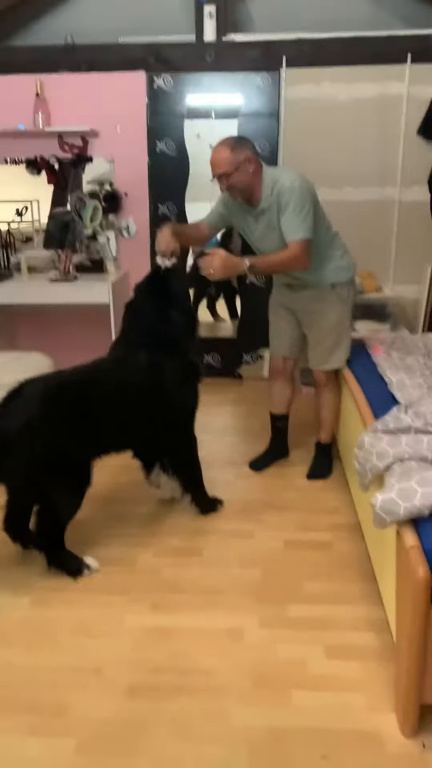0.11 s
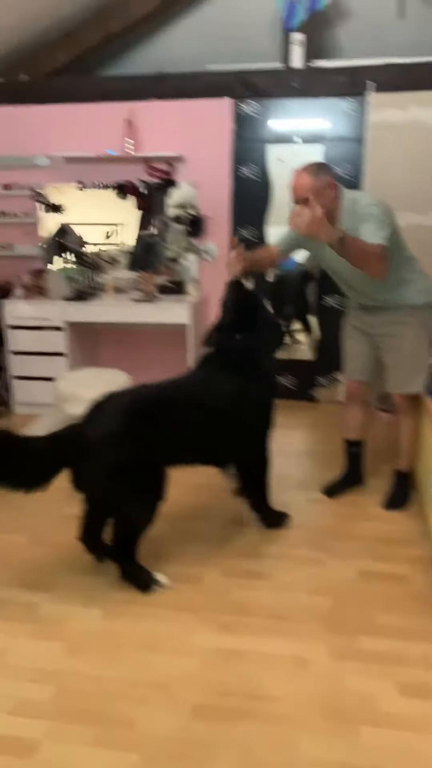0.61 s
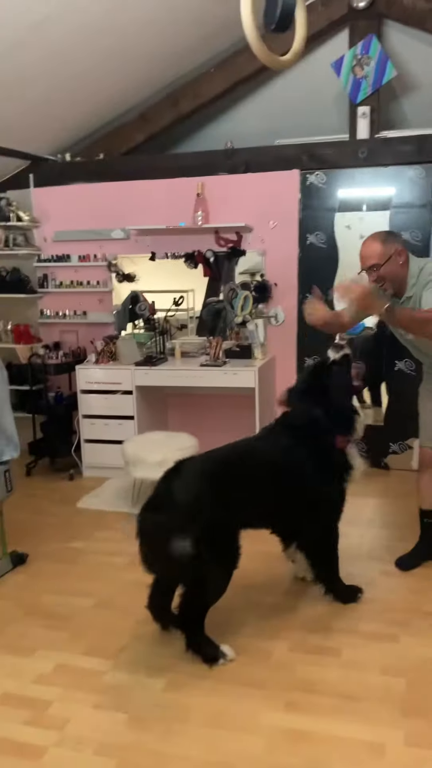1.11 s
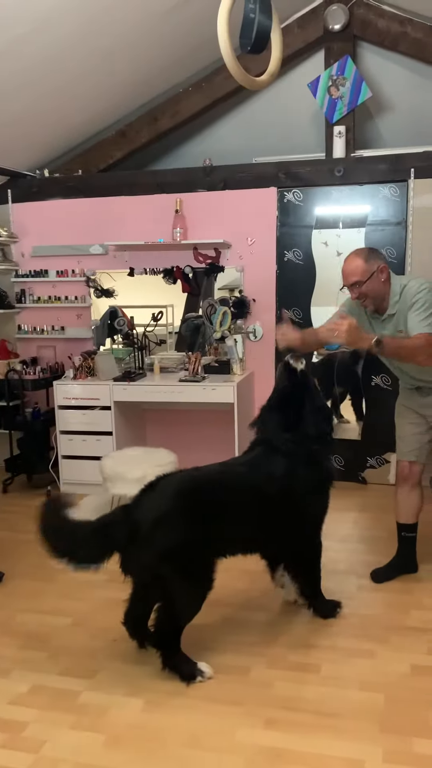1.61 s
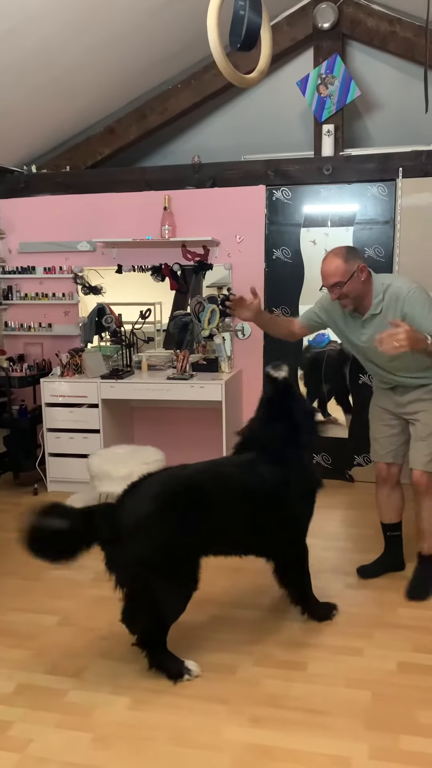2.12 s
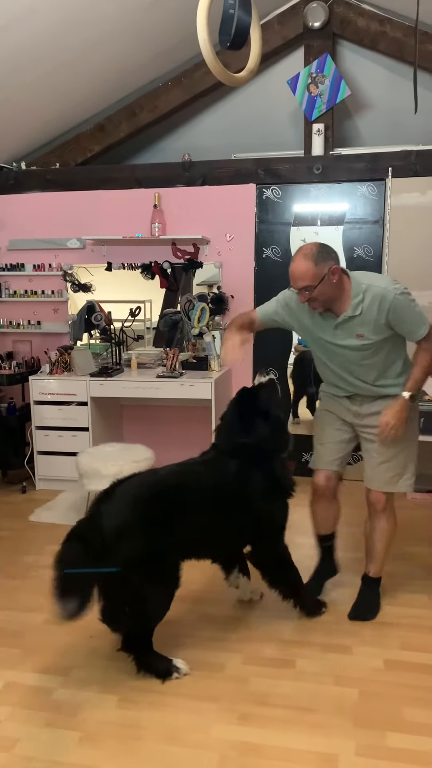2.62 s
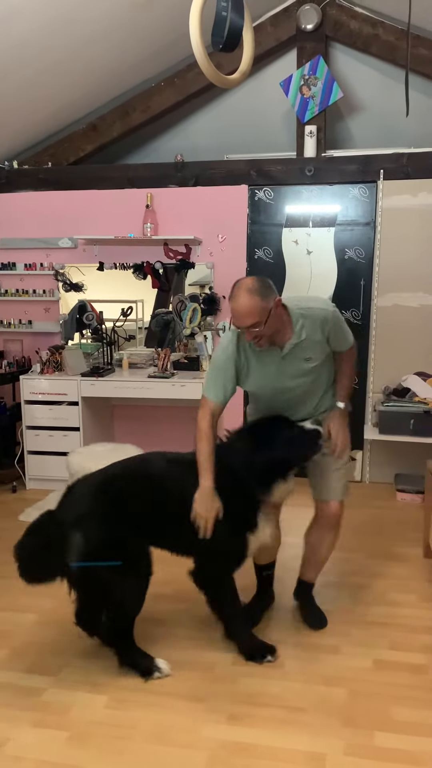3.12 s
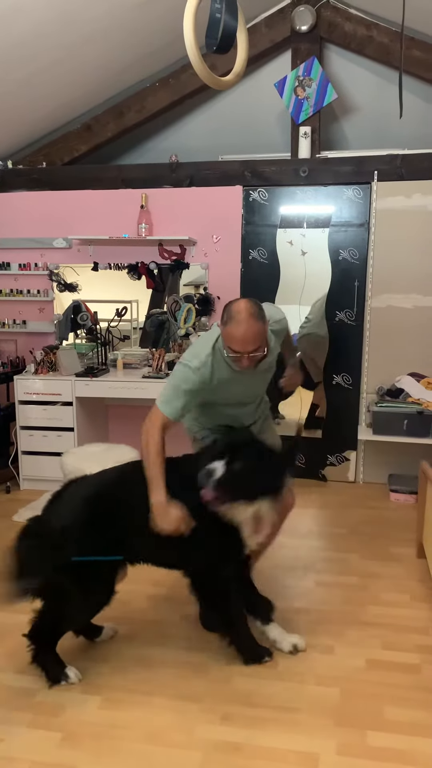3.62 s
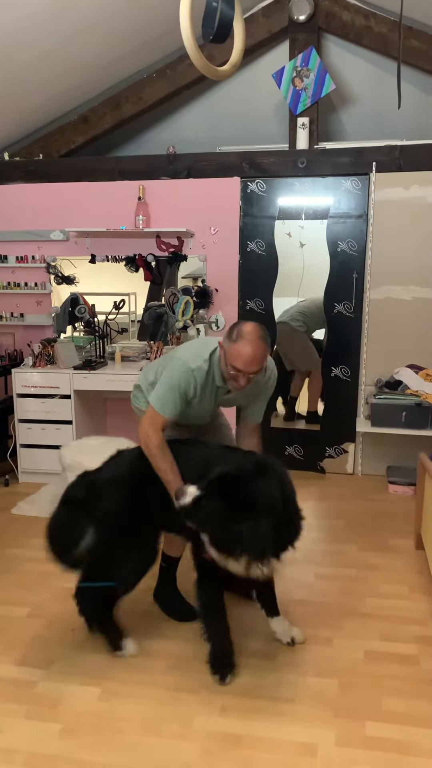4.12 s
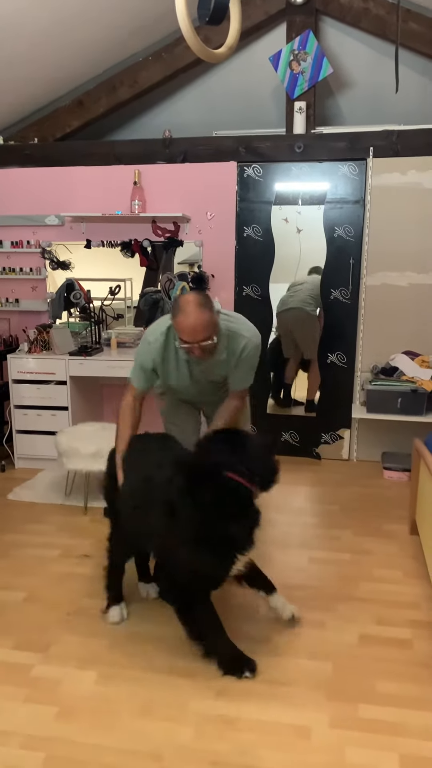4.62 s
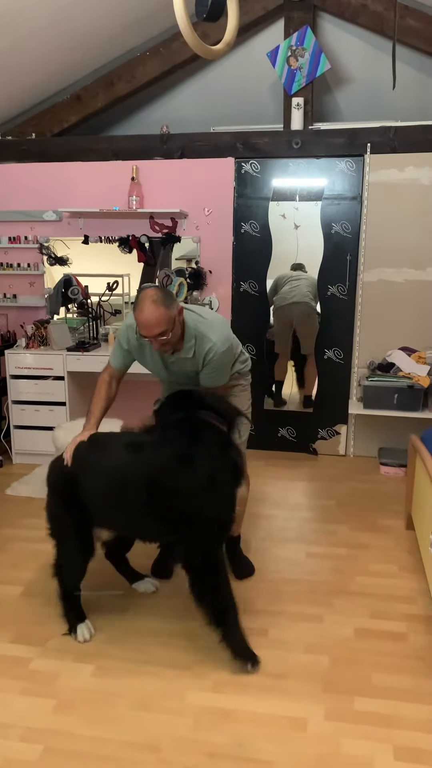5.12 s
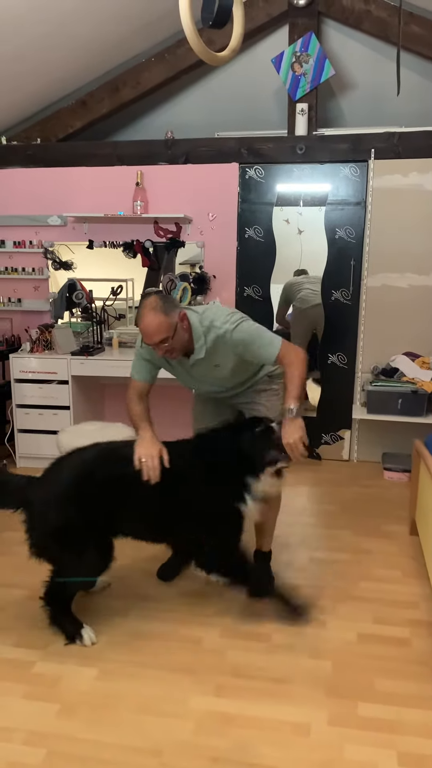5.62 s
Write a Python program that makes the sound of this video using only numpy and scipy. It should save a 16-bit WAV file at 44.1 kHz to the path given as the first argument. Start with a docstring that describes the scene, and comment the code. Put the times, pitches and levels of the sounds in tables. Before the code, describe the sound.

A big dog plays in a furnished attic room. Soft, rough growls and quick huffs come in the first two seconds, with scattered claw cracks and muffled paw slides. A hard stomp lands near three seconds, then scuffs, huffs and brighter scrabbling lead to heavy claw-and-paw blows at the end. Close handheld stereo microphone, short room ring, faint hush.

```python
"""Large dog at play in an attic room

A large dog growls and huffs; its claws crack on a hollow laminate floor, its paws thud, slide and scuff.
Voice and breath are sources filtered by resonances, slides and cracks are shaped noise, and the
struck floor is a sum of dying modes. The furnished room rings for about half a second over a faint
hush. Two microphone ports hear the same treble a fraction of a millisecond apart."""
import sys
import numpy as np
from scipy import signal
from scipy.fft import rfft, irfft
from scipy.io import wavfile
from scipy.ndimage import uniform_filter1d

SR = 44100
rng = np.random.default_rng(int(sys.argv[2]) if len(sys.argv) > 2 else 0)


def boost(x):
    """Linear amplitude factor 10**(x/20) for a level x in decibels (scalar or array-like)."""
    u = np.asarray(x, float) / 20
    return 10 ** u


def put_to_file(sound):
    """Save the sound as 16-bit audio at rate SR, in the file named by the first command-line argument."""
    columns = np.atleast_2d(sound).T  # one column per channel
    safe = np.clip(columns, -1, 1)
    whole_steps = np.round(safe * 32767)
    wavfile.write(sys.argv[1], SR, whole_steps.astype(np.int16))


N = 253134  # samples


def evened(x):
    """Normalisation: scales x to an rms of 1."""
    return x / np.sqrt(np.mean(x ** 2) + 1e-20)


def slow_noise(count, size):
    """Random modulation: white noise averaged over size samples, rms 1."""
    return evened(uniform_filter1d(rng.standard_normal(count), size=size))


def read(points, hz):
    """Logarithmic frequency scale: interpolates a curve of (Hz, value) points."""
    f, value = np.transpose(points)
    return np.interp(np.log(hz + 1), np.log(f + 1), value)


def coloured(x, gain_db):
    """Linear filtering: multiplies the spectrum by a gain that depends on frequency."""
    return irfft(rfft(x) * boost(gain_db(np.fft.rfftfreq(len(x), 1 / SR))), len(x))


def add(mix, start_s, sound):
    """Superposition: adds a sound to the mix in place, cut off at the end."""
    part = mix[round(start_s * SR):][:len(sound)]
    part += sound[:len(part)]


def swell(length_s, peak, ends_db):
    """Amplitude envelope: climbs to 1 at the place peak and sinks to ends_db at both ends."""
    u = np.linspace(0, 1, round(length_s * SR))
    peak = np.clip(peak, .02, .98)
    away = np.where(u < peak, 1 - u / peak, (u - peak) / (1 - peak))
    return boost(ends_db * away ** 2) * signal.windows.tukey(len(u), .06)


def resonate(x, hz, width_hz):
    """Heterodyne resonance: shifts hz (fixed or gliding) to zero, smooths twice, shifts back; gain 1."""
    turn = np.exp(2j * np.pi * np.cumsum(hz * np.ones(len(x))) / SR)
    r = np.exp(-np.pi * width_hz / SR)
    once = signal.lfilter([1 - r], [1, -r], x / turn)
    twice = signal.lfilter([1 - r], [1, -r], once)
    return 2 * (turn * twice).real


def ring(modes, weights, rise_s):
    """Modal decay: a blow excites damped modes, each detuned a little at random; peak 1."""
    t = np.arange(SR // 4)[:, None] / SR
    hz, level_db, t60_s = np.transpose(modes)
    detune, start = rng.random((2, len(hz)))
    phase = 2 * np.pi * (hz * (0.966 + 0.073 * detune) * t + 0.089 * start)
    tones = boost(level_db - 60 * t / t60_s) * np.sin(phase)
    out = (tones * weights).sum(1) * (1 - np.exp(-t[:, 0] / rise_s))
    return out / abs(out).max()


# Colour of the background hush: [frequency_hz, relative level_db]
HUSH_COLOUR = [(24, -47), (40, -4), (866, 7), (1170, 6), (6300, -9), (8690, -11), (15000, -20)]


def hush():
    """Stationary noise: two independent coloured noises, one a channel, at a steady rms level."""
    level_db = -63
    noises = rng.standard_normal((2, N))
    return boost(level_db) * np.array([evened(coloured(v, lambda hz: read(HUSH_COLOUR, hz))) for v in noises])


# Colour of a bright rub: [frequency_hz, relative level_db]
RUB_COLOUR = [(200, -17.5), (800, -27), (2500, -7.5), (5500, 1), (8000, -1), (11000, -10), (15500, -19)]
# Change of colour at full dullness, of rubs and cracks alike: [frequency_hz, gain_db]
DULLING = [(200, 20), (1000, 21), (3000, -0.5), (6000, -10), (15500, -42.5)]


def slide(length_s, level_db, dullness, peak):
    """Sliding friction: uneven grains of grit come in clumps; a duller and a brighter rub mix."""
    shape = swell(length_s, peak, -19)
    dullness = np.clip(dullness, 0, 1)
    clumps = slow_noise(len(shape), 700)
    grains = np.minimum(rng.exponential(1, (2, len(shape))), 5)
    grit = rng.standard_normal((2, len(shape))) * boost(3.9 * grains + 4.1 * clumps)
    bright = evened(coloured(grit[0], lambda hz: read(RUB_COLOUR, hz)))
    soft = evened(coloured(grit[1], lambda hz: read(RUB_COLOUR, hz) + read(DULLING, hz)))
    mixed = np.sqrt(1 - dullness) * bright + np.sqrt(dullness) * soft
    return boost(level_db) * mixed * shape


# Slides of the paws: [start_s, length_s, pressure_db, dullness (0-1), place of the peak (0-1)]
PAW_SLIDES = [(0.102, 0.11, -51.5, 0.96, 0), (0.214, 0.1, -51.5, 0.94, 0.16), (.5, 0.21, -46, 0.94, 0),
              (0.819, 0.12, -39.5, .7, 0.28), (1.147, 0.082, -45.5, 0.68, 0.06),
              (1.406, .06, -56.5, 0.1, 0.55), (1.75, 0.18, -52.5, 0.67, 0),
              (2.066, 0.21, -43.5, 0.76, 0.56), (2.383, .11, -50, 1, 0.4), (2.558, 0.13, -38.5, 0.48, 0.24),
              (2.822, 0.19, -42.5, 0.89, 0.01), (3.112, 0.27, -34.5, 0.16, 0.33),
              (3.407, 0.13, -42, 0.5, 0.54), (3.601, 0.15, -41, 0.7, 0), (3.792, 0.18, -38, 0.88, 0.4),
              (3.971, .08, -40, 0.48, 0.12), (4.065, 0.18, -35.5, 0.14, 0), (4.249, 0.2, -50, 0.4, 0.66),
              (4.546, 0.12, -36, 0.09, 0), (4.645, 0.19, -43.5, 0.25, 0.46),
              (4.933, 0.076, -40.5, 0.4, 0.23), (5.016, 0.22, -38.5, 0.23, 0),
              (5.243, 0.19, -29.5, 0.02, 0.49)]


def paw_slides():
    """Sliding friction: lays out the slides of the paws."""
    rubs = np.zeros(N)
    for start_s, *row in PAW_SLIDES:
        add(rubs, start_s, slide(*row))
    return rubs


# Low modes of the floor on its joists: [frequency_hz, level_db, t60_s]
FLOOR_MODES = [(57.3, -51, 0.214), (82, -2.5, 0.31), (96.6, 2, 0.11), (142.2, -2.5, 0.13), (208, -12, 0.12),
               (244.3, -9.5, 0.098), (286.5, -6.5, 0.065)]


def thud(peak_db, deep):
    """Modal excitation: the weight of a paw sets the whole floor booming."""
    low = np.array([hz < 120 for hz, *_ in FLOOR_MODES])
    weights = np.where(low, np.clip(deep, 0, 1), np.clip(1 - deep, 0, 1))
    return boost(peak_db) * ring(FLOOR_MODES, weights, .005)


# Paw landings: [start_s, peak_db, share of the deepest floor modes (0-1)]
LANDINGS = [(0.364, -27, 0.07), (0.714, -18, 0.05), (1.002, -25.5, 0.13), (1.93, -17.5, 0.1),
            (2.253, -23, 0.24), (2.448, -25.5, 0.12), (2.679, -25.5, 0.12), (2.85, -21, 0.3),
            (3.04, -13, 0.18), (3.318, -27, 0.4), (3.555, -20, 0.11), (3.901, -37.5, 0.22),
            (4.334, -33, 0.2), (4.418, -19.5, 0.17), (4.511, -20, 0.3), (5.084, -29, 0.13),
            (5.501, -14.5, 0.2), (5.605, -14, 0.1)]


def paw_thuds():
    """Impact: lays out the booms of the landing paws."""
    booms = np.zeros(N)
    for start_s, *row in LANDINGS:
        add(booms, start_s, thud(*row))
    return booms


# Colour of a claw crack: [frequency_hz, relative level_db]
CRACK_COLOUR = [(300, -15.5), (1000, -13.5), (2500, -11), (5000, -3), (7300, -3), (8500, -5.5),
                (11000, -12), (15500, -22.5)]


def crack(peak_db, dullness):
    """Impulsive contact: claws hit the floor together in one short, sharp noise burst."""
    t = np.arange(2048) / SR
    shape = (1 - np.exp(-t / .0004)) * (np.exp(-t / .003) + .1 * np.exp(-t / .007))
    z = rfft(rng.standard_normal(len(t)) * shape)
    burst = irfft(z / abs(z)) * np.sqrt(shape)  # evening the spectrum: no pitch stands out
    burst = coloured(burst, lambda hz: read(CRACK_COLOUR, hz) + dullness * read(DULLING, hz))
    return boost(peak_db) * burst / abs(burst).max()


# Modes of the floor boards: [frequency_hz, level_db, t60_s]
BOARD_MODES = [(693, -17, 0.057), (762.3, 3, 0.082), (924, -10, 0.14), (1150, -1.5, 0.053),
               (1596, 2, 0.027), (2097, -4, 0.021)]


def knock(peak_db):
    """Modal excitation: the struck boards knock, each mode driven by a random amount."""
    return boost(peak_db) * ring(BOARD_MODES, rng.uniform(.5, 1, len(BOARD_MODES)), .002)


# Claw strikes: [start_s, crack peak_db, knock peak_db, dullness (0-1)]
STRIKES = [(0.3636, -13, -25, 0.42), (0.702, -8, -47, 0.24), (0.9703, -12.5, -18.5, 0.39),
           (1.4639, -14, -35.5, 0.21), (1.918, -6, -25, 0.28), (2.2448, -10.5, -28, 0.32),
           (3.0224, -3.5, -14, 0.16), (3.5428, -6.5, -23.5, 0.12), (3.7744, -18, -31, 0.13),
           (4.0662, -21.5, -40, 0.26), (4.4145, -27.5, -27.5, 0.01), (4.4893, -10.5, -17.5, 0.19),
           (5.0122, -14.5, -31, 0.2), (5.0685, -11.5, -29.5, 0.2), (5.4875, -7, -22, 0.16),
           (5.4964, -16.5, -17.5, 1), (5.5968, -5, -14, 0.04)]


def claw_strikes():
    """Friction then impact: each paw skids in just before its claws crack and the boards knock."""
    skid_s, skid_db, skid_dullness = 0.013, -28, 0.33  # level relative to the crack's peak
    skids, cracks, knocks = np.zeros((3, N))
    for start_s, crack_db, knock_db, dullness in STRIKES:
        add(skids, start_s - skid_s, slide(skid_s, crack_db + skid_db, skid_dullness, 0.61))
        add(cracks, start_s, crack(crack_db, dullness))
        add(knocks, start_s, knock(knock_db))
    return skids, cracks, knocks


# Treble gain of the cracks towards the microphone: [frequency_hz, gain_db]
BEAM = [(2500, 0), (6000, 3.5)]


def beamed(cracks):
    """Directivity: the treble of the cracks beams towards the microphone."""
    return coloured(cracks, lambda hz: read(BEAM, hz))


def puff(length_s, level_db, centre_hz, peak):
    """Filtered noise: fluttering noise in a broad resonance, with a weaker one above it."""
    shape = swell(length_s, peak, -17)
    noise = rng.standard_normal(len(shape)) * boost(3.0 * slow_noise(len(shape), 400))
    lower = resonate(noise, centre_hz, 0.37 * centre_hz)
    upper = resonate(noise, 1.79 * centre_hz, 500)
    return boost(level_db) * evened(lower + boost(-10) * upper) * shape


# Breath huffs, and one short paw scuff near 2.3 kHz shaped the same way:
# [start_s, length_s, level_db, centre_hz (of the mouth, for a huff), place of the peak (0-1)]
HUFFS_AND_SCUFF = [(0.127, 0.07, -48.5, 1180, 0.03), (0.795, 0.13, -34.5, 1085, 0.45),
                   (1.343, 0.059, -46, 1150, 0.08), (1.78, 0.12, -39.5, 1110, 0.38),
                   (2.619, .1, -46, 1150, 0.8), (2.826, 0.14, -44, 896, 0), (3.781, 0.16, -40.5, 900, 0.48),
                   (3.967, 0.1, -47, 1030, 0.5), (4.078, .16, -43.5, 977, 0.33),
                   (4.268, 0.058, -43, 960, 0.27), (4.356, 0.08, -38, 930, 0.4),
                   (4.358, 0.076, -46.5, 1390, 0), (4.783, 0.068, -42.5, 2250, 0.53),
                   (5.061, 0.082, -39.5, 935, 0.06)]


def huffs_and_scuff():
    """Noise sources: lays out the breath huffs and the one paw scuff."""
    puffs = np.zeros(N)
    for start_s, *row in HUFFS_AND_SCUFF:
        add(puffs, start_s, puff(*row))
    return puffs


def columns(rows):
    """Linear interpolation: draws each column after the first as a curve over time."""
    s, *values = np.transpose(rows)
    t = np.arange(s[0], s[-1], 1 / SR)
    return [np.interp(t, s, v) for v in values]


# Chest and throat resonances, one row each: [frequency_hz, width_hz]
BODY_RESONANCES = [(160, 403), (320, 300)]
# What the muzzle radiates: [frequency_hz, gain_db]
MUZZLE = [(50, -22), (80, 0), (125, 1), (850, -1.5), (1100, -8)]


def growl(rows, throat_db):
    """Source and filter: loose vocal folds flap unevenly, in bursts, into chest, throat and mouth."""
    pitch_hz, burst_hz = 165.14, 36  # averages
    shut_db, open_db, shut_hz, open_hz = -19, 8.5, 570, 725  # the mouth at openings 0 and 1
    effort_db, opening = columns(rows)
    count = len(opening)
    turns = np.cumsum(pitch_hz * (1 + .12 * slow_noise(count, 400))) / SR
    folds = sum(np.cos(2 * np.pi * k * turns) for k in range(1, 9))
    puffs = np.exp(-(turns % 1) / 0.36) * rng.standard_normal(count)  # air noise in each cycle
    bursts = np.cumsum(burst_hz * (1 + .4 * slow_noise(count, 1200))) / SR
    throb_db = 4 * np.cos(2 * np.pi * bursts) + 2 * slow_noise(count, 500)
    drive = (evened(folds) + 4.5 * evened(puffs)) * boost(throb_db)
    chest, throat = (evened(resonate(drive, hz, width_hz)) for hz, width_hz in BODY_RESONANCES)
    # the mouth resonance grows and rises as the jaws part
    mouth = evened(resonate(drive, shut_hz + (open_hz - shut_hz) * opening, 257))
    mouth_db = shut_db + (open_db - shut_db) * opening
    voice = chest - boost(throat_db) * throat + boost(mouth_db) * mouth
    voice = coloured(voice, lambda hz: read(MUZZLE, hz))
    return boost(effort_db) * voice * signal.windows.tukey(count, .08)


# Growls, one list of points each: [time_s, effort_db, mouth opening (0 shut, 1 open, may exceed 1)]
GROWL_PATHS = [
    [(.09, -34, 0.45), (.14, -41.5, 0.57), (.23, -36.5, 0.72), (.3, -36.5, 0.3), (.36, -35, 0.83),
     (.45, -38.5, 0.7), (.57, -31.5, 0.2), (.7, -36, 0.45), (.88, -46, 0.75)],
    [(1.37, -45.5, 0.57), (1.48, -40.5, 0.51), (1.6, -40, 0.42), (1.7, -37, 0.62), (1.85, -34, 0.76),
     (2.0, -36.5, 0.71), (2.14, -31.5, 0.13), (2.23, -63, 0.3)],
    [(2.62, -47.5, 0.84), (2.7, -48, 0.73), (2.75, -55.5, 0.5), (2.8, -39.5, 0.49), (2.88, -32, 0.46),
     (3.0, -69, 0.4)],
    [(4.68, -42, .2), (4.72, -37.5, 0.37), (4.81, -48.5, 0.35), (4.89, -61, 0.28)],
    [(5.29, -45.5, 0), (5.37, -53, 0.8), (5.4, -37.5, 0.91), (5.44, -51, 1.1), (5.49, -55, 1.26)],
]
# Throat relative to chest, one value a growl: [level_db]
THROAT_LEVELS = [-6, -5.5, 4.5, -7.5, -0.5]


def growls():
    """Phonation: lays out the growls, each with its own balance of throat and chest."""
    voice = np.zeros(N)
    for rows, throat_db in zip(GROWL_PATHS, THROAT_LEVELS):
        add(voice, rows[0][0], growl(rows, throat_db))
    return voice


# Reverberation time by frequency: [frequency_hz, t60_s]
DECAY_TIMES = [(60, 0.46), (200, 0.5), (700, 0.64), (2000, 0.54), (5000, 0.46), (9000, 0.28), (14000, 0.36)]
# Echoes off floor, sloping ceiling and walls: [delay_s, level_db]
REFLECTIONS = [(.0035, -31.5), (.007, -17.5), (0.0103, -14.5), (0.0157, -10.5), (.023, -17)]


def room(direct, sent):
    """Reverberation: echoes, then tails of sparse taps, each band dying at its own speed."""
    onset_s, count = 0.007, 3  # build-up of the tails, number of stereo tails
    taps = np.zeros((2 * count, SR))
    at = np.arange(100, SR - 12, 12)
    at = at + rng.integers(0, 12, (2 * count, len(at)))
    np.put_along_axis(taps, at, rng.choice([-1., 1.], at.shape), 1)
    hz, t, z = signal.stft(taps, SR, nperseg=512)
    decay = boost(-60 * t / read(DECAY_TIMES, hz)[:, None])
    tail = signal.istft(z * decay, SR, nperseg=512)[1][:, :SR]
    tail *= 1 - np.exp(-np.arange(SR) / SR / onset_s)
    tail /= np.linalg.norm(tail[0])
    echoes = np.zeros(SR // 10)
    for delay_s, level_db in REFLECTIONS:
        echoes[round(delay_s * SR)] = boost(level_db)
    out = direct + signal.oaconvolve(sent, echoes)[:N] * np.ones((2, 1))
    # the tails take turns at a steady pace, so no single random tail colours every sound
    for k in range(count):
        share = np.sqrt(2 / count) * np.cos(np.pi * (np.arange(N) / SR * 1.3 + k / count))
        out += signal.fftconvolve((sent * share)[None], tail[2 * k:2 * k + 2], axes=1)[:, :N]
    return out


def scene():
    """Superposition: direct sounds and the room's answer to them, over the hush."""
    background = hush()
    skids, cracks, knocks = claw_strikes()
    rubs = paw_slides() + skids
    booms = paw_thuds()
    voice = huffs_and_scuff() + growls()
    # short cracks fill the room most; knocks and thuds travel mostly through the floor itself
    sent = boost(0.5) * voice + boost(1.0) * rubs + boost(5.5) * cracks + boost(-4) * knocks + boost(-6.5) * booms
    direct = voice + rubs + beamed(cracks) + knocks + booms
    return room(direct, sent) + background


def low_pass(x):
    """Removes everything above the highest recorded frequency."""
    return signal.sosfilt(signal.butter(12, 16970, fs=SR, output="sos"), x)


# Band edges of the microphone: [frequency_hz, gain_db]
MIC_BAND = [(25, -30), (45, -10), (70, 0), (15500, 0), (16000, -40), (17000, -70)]
# Left-right likeness: [frequency_hz, likeness (0-1)]
LIKENESS = [(100, 0.99), (340, 1), (800, 0.47), (1400, 0.33), (2600, 1), (3500, 1), (4500, 1)]
# Phase by which the left port leads: [frequency_hz, lead_rad]
LEFT_LEAD = [(0, 0), (100, -.03), (860, -.66), (1500, 0), (2300, 1.4), (3700, 1.75), (4700, 3.15),
             (16000, 19.6)]
# Level of left over right: [frequency_hz, difference_db]
LEFT_TILT = [(100, 0.5), (270, 3.5), (800, 1.5), (1500, 0.1), (4000, 0)]


def record(dry):
    """Coherence of two ports: the right one hears the left one's sound shifted in phase,
    in the middle range mixed with another part of the room."""
    hz = np.fft.rfftfreq(N, 1 / SR)
    here, there = rfft(dry, axis=1) * boost(read(MIC_BAND, hz))
    same = np.clip(read(LIKENESS, hz), 0, 1)
    lag = np.exp(-1j * np.interp(hz, *np.transpose(LEFT_LEAD)))
    right = lag * (same * here + np.sqrt(1 - same ** 2) * there)
    tilt = boost(read(LEFT_TILT, hz) / 2)  # half to each port
    ports = irfft(np.array([here * tilt, right / tilt]), N, axis=1)
    return low_pass(ports)


dry = scene()
out = record(dry)
put_to_file(out)
```